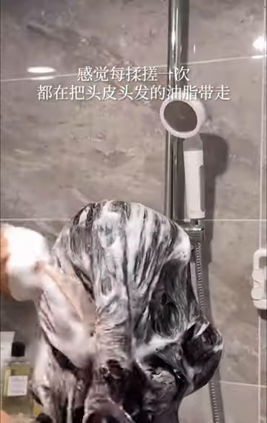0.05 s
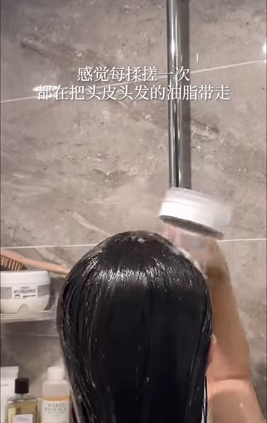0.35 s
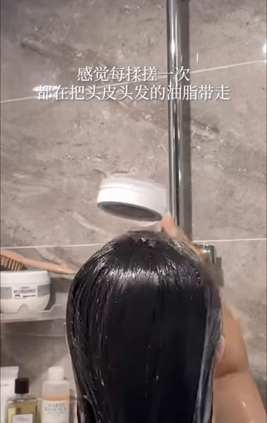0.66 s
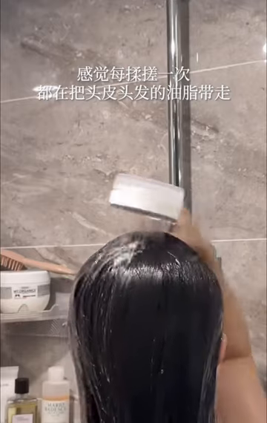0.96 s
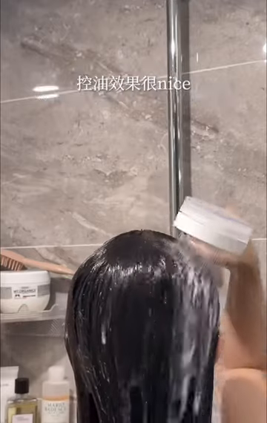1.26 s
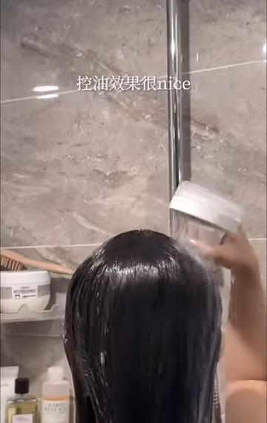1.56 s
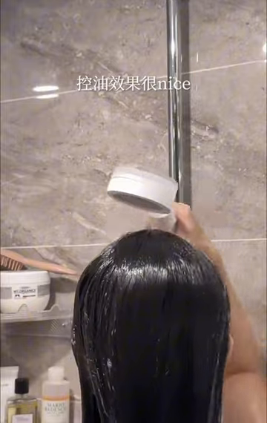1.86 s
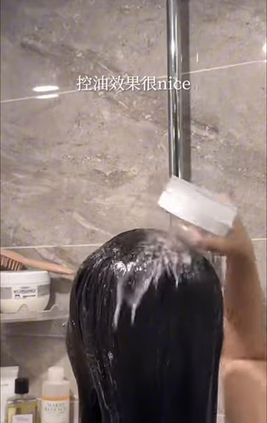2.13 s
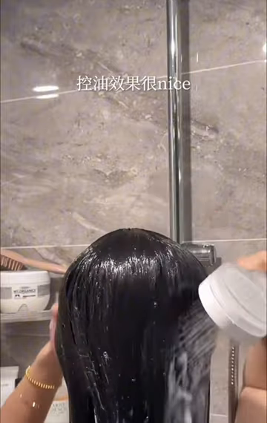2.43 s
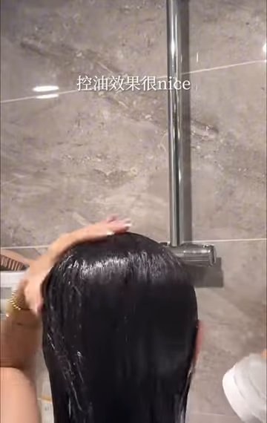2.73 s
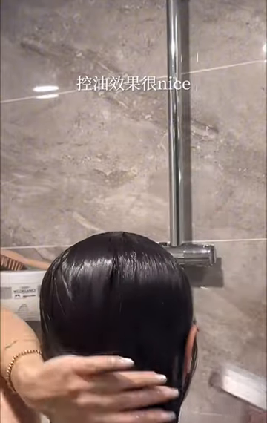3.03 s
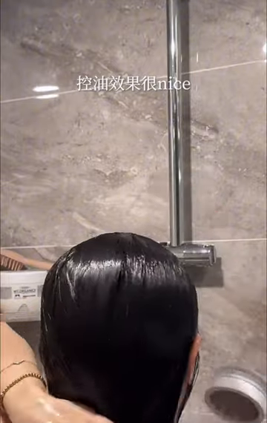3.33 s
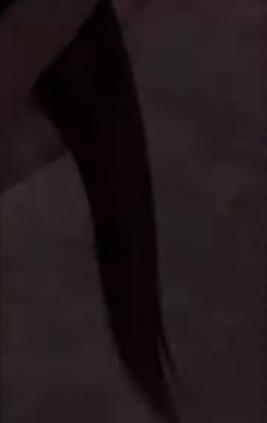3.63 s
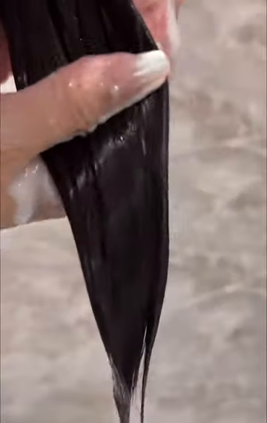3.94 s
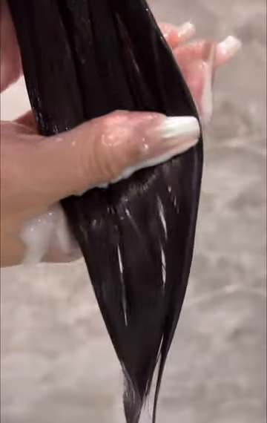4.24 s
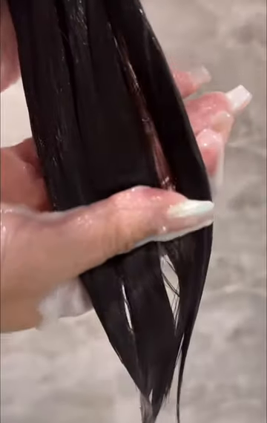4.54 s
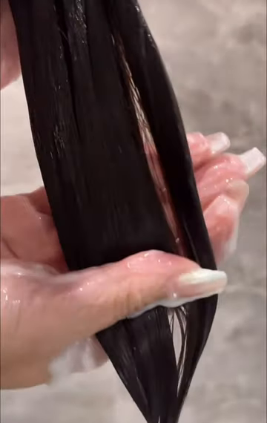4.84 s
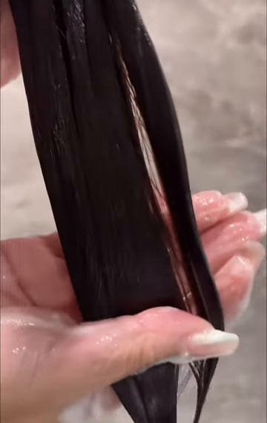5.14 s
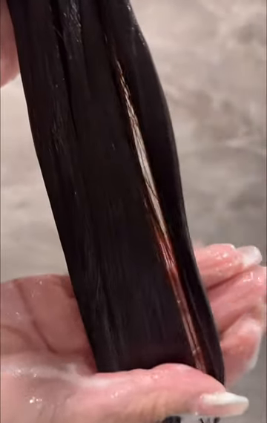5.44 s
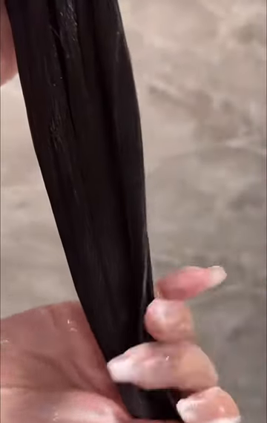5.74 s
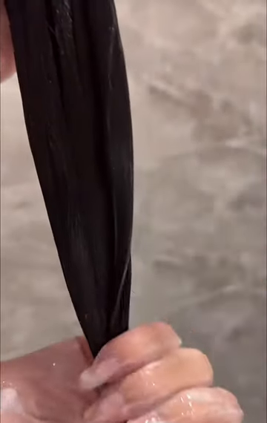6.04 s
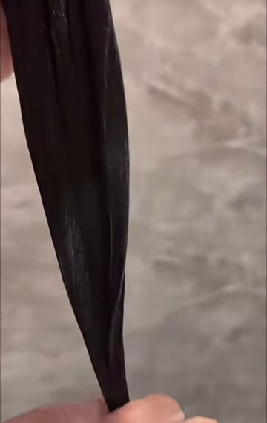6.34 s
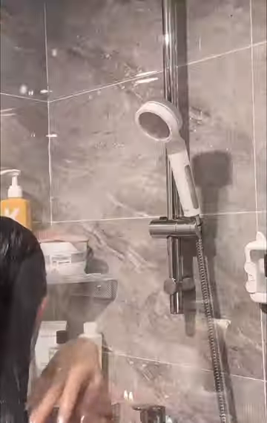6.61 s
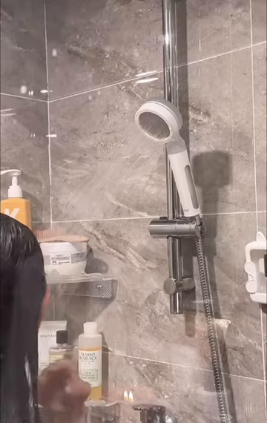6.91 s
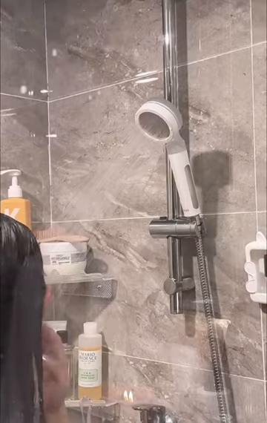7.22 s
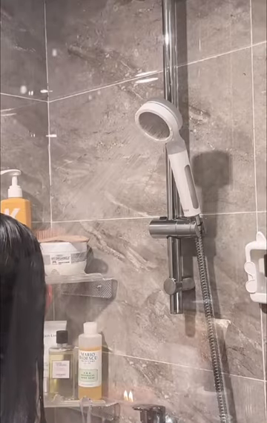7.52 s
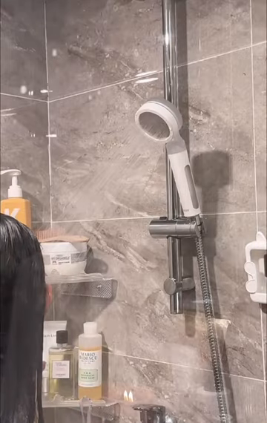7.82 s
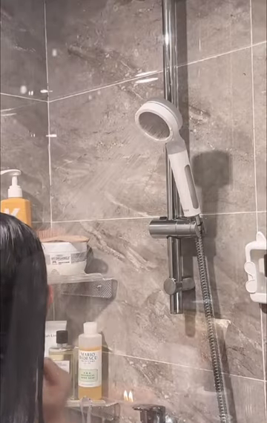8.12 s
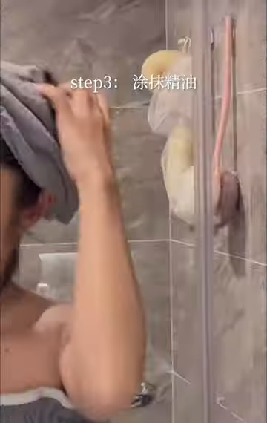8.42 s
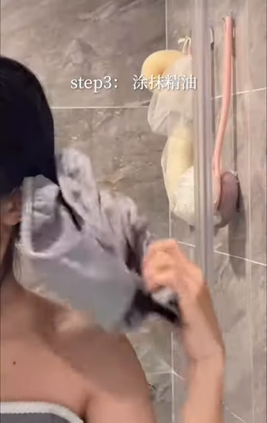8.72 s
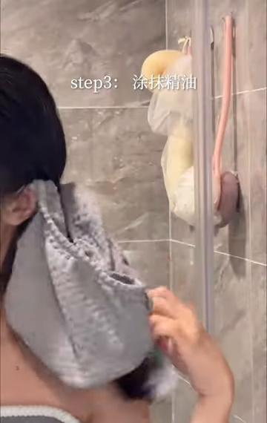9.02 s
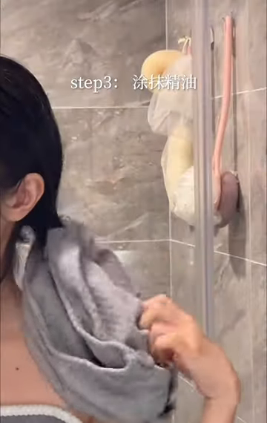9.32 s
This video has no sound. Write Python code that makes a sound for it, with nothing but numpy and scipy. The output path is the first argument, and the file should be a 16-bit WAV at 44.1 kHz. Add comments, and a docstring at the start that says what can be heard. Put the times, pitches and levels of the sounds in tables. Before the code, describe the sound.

Hands briefly squelch through lather, then a hand shower hisses and splashes over hair, drumming lightly on the scalp. The water cuts off, leaving soft crackles and tiny pops as fingers draw conditioner down wet strands over a faint fan hum. The shower returns, splashing on tiles, then gives way to a quiet towel rustle. Everything is heard close up in a small tiled bathroom, with abrupt changes.

```python
"""A hand shower rinses hair in a small tiled bathroom: countless drops splash, hiss and drum on the scalp.
Just before it, hands squelch through lather. After it, fingers draw conditioner down a wet lock, popping
tiny films; the shower runs again, splashing on the tiles; and a towel rustles off the hair.
The five actions follow each other abruptly, over a faint pump, pipes or fan."""
import sys
import numpy as np
from scipy import signal
from scipy.fft import rfft, irfft
from scipy.io import wavfile

SR = 44100
rng = np.random.default_rng(int(sys.argv[2]) if len(sys.argv) > 2 else 0)


def to_wav(s):
    """Save 16-bit WAV."""
    ch = np.atleast_2d(s).T  # columns
    pcm = np.round(np.clip(ch, -1, 1) * 32767)  # PCM
    wavfile.write(sys.argv[1], SR, pcm.astype(np.int16))


N = 422037
TIME = np.arange(N) / SR
# when each action is heard: (start [s], end [s])
LATHER_SPAN, RINSE_SPAN, CONDITIONER_SPAN = (-.1, .329), (.364, 3.669), (3.669, 6.43)
SHOWER_SPAN, TOWEL_SPAN = (6.433, 8.37), (8.43, 9.7)


def from_db(db):
    """Turn decibels into a gain to multiply by."""
    return 10 ** (np.asarray(db) / 20)


def rms_one(x):
    """Scale a sound (in stereo, the mean of both sides) to an average strength, or rms, of 1."""
    return x / np.sqrt(np.mean(np.atleast_2d(x).mean(0) ** 2) + 1e-20)


def gains(rows):
    """Join the points of each level column into a gain for every sample."""
    times, *columns = np.transpose(rows)
    return [from_db(np.interp(TIME, times, db)) for db in columns]


def during(span):
    """A gain of 1 inside the span and 0 outside, with quick smooth fades."""
    return .5 + .5 * np.tanh(np.minimum(TIME - span[0], span[1] - TIME) / .008)


def bursts(rows, rise_s, fall_s):
    """The loudness of short contacts: each rises, holds and dies away."""
    return sum(from_db(db) * np.clip((TIME - start) / rise_s, 0, 1)
               * np.exp(-np.maximum(TIME - start - length, 0) / fall_s) for start, length, db in rows)


def swells(rows, half_s):
    """A bell-shaped bump in dB around each listed moment."""
    return sum(db * np.exp(-((TIME - at) / half_s) ** 2) for at, db in rows)


def flutter(rate_hz, depth_db):
    """A gain that wanders at random around 1."""
    step, settle = 40, 2000  # samples per random value; values skipped while the filter settles
    pole = np.exp(-2 * np.pi * step * rate_hz / SR)
    noise = rng.standard_normal(N // step + settle + 2)
    slow = signal.lfilter([1], [1, -2 * pole, pole * pole], noise)[settle:]
    return np.interp(np.arange(N) / step, np.arange(len(slow)), from_db(depth_db * rms_one(slow)))


def colour(x, spectrum, size=2048):
    """Make each frequency louder or softer, as a table says."""
    hz, db = np.transpose(spectrum)
    bins = np.maximum(np.fft.rfftfreq(size, 1 / SR), 1)
    cepstrum = irfft(np.log(from_db(np.interp(np.log(bins), np.log(hz), db))))
    # minimum phase: the filter rings only after a click, never before it
    cepstrum[1:size // 2] *= 2
    cepstrum[size // 2 + 1:] = 0
    return signal.oaconvolve(x, irfft(np.exp(rfft(cepstrum))))[:N]


def band(x, low_hz, high_hz, order=3):
    """Keep only the sound between two frequencies; rms 1."""
    sos = signal.butter(order, [low_hz, min(high_hz, .45 * SR)], "band", fs=SR, output="sos")
    return rms_one(signal.sosfilt(sos, x + 1e-18))


def resonate(x, hz, width_hz):
    """Ring at one pitch; the narrower the width, the longer the ring."""
    pole = np.exp(-np.pi * width_hz / SR)
    feedback = [1, -2 * pole * np.cos(2 * np.pi * hz / SR), pole * pole]
    return signal.lfilter(np.array([1, 0, -1]) * (1 - pole * pole) / 2, feedback, x + 1e-18)


def body(x, modes):
    """An object rings at its own pitches, each filtered twice so that little else gets through; rms 1."""
    return rms_one(sum(from_db(db) * rms_one(resonate(resonate(x, hz, 1.25 * width), hz, 1.25 * width))
                       for hz, width, db in modes))


def impacts(per_s, spread_db):
    """Tiny blows at random moments, most weak and a few strong."""
    at = np.flatnonzero(rng.random(N) < per_s / SR)
    strength = from_db(spread_db * np.minimum(rng.exponential(1, len(at)), 4))
    out = np.zeros(N)
    out[at] = strength * rng.choice([-1, 1], len(at))
    return out


def widen(mid, side, width):
    """Make stereo: a second sound is added on the left and subtracted on the right."""
    return mid + colour(side, width) * np.array([[1], [-1]])


def drops(per_s, spread_db, spectrum, width):
    """The stereo patter of many small impacts; rms 1."""
    return rms_one(widen(*[colour(impacts(per_s, spread_db), spectrum) for _ in range(2)], width))


def bubbles(per_s, spread_db, low_hz, high_hz, cycles, count=10):
    """Air pockets burst at random, each ringing briefly at a pitch set by its size; rms 1."""
    clicks, sizes = impacts(per_s, spread_db), rng.integers(0, count, N)
    pitches = np.geomspace(low_hz, min(high_hz, .4 * SR), count)
    rings = (resonate(clicks * (sizes == k), hz, 1.7 * hz / cycles) for k, hz in enumerate(pitches))
    return rms_one(sum(rings))


# tone of the moving air: (frequency [Hz], level [dB])
AIR_COLOUR = [(25, -7), (70, 0.5), (150, -5), (300, -8), (500, -12), (1000, -22.5), (4000, -22.5),
              (16000, -31.5)]
# stereo spread of the room: (frequency [Hz], side level [dB])
ROOM_WIDTH = [(70, -2), (200, -16), (700, -5), (2400, -21)]
# hum of the fan from near and from far: (pitch [Hz], width [Hz], level [dB])
FAN_NEAR = [(72, 22, -10.5), (119, 8.8, -6.5), (198.4, 29.6, 2.5), (326, 17, -9.5)]
FAN_FAR = [(69.4, 16, -8), (137, 13, -0.5), (239, 4.8, -0.5)]

def fan():
    """A fan hums behind the conditioner and the towel; a faint rush of air never stops."""
    air = drops(20000, 1, AIR_COLOUR, ROOM_WIDTH)
    mono_air = air.mean(0)
    near_hum = body(widen(*rng.standard_normal((2, N)), ROOM_WIDTH), FAN_NEAR)
    near = from_db(-49) * near_hum + from_db(-54) * air
    far = from_db(-56) * body(rng.standard_normal(N), FAN_FAR) + from_db(-63) * mono_air
    return near * during(CONDITIONER_SPAN) + far * during(TOWEL_SPAN) + from_db(-63.5) * mono_air


# drone of the pump: (pitch [Hz], width [Hz], level [dB])
PUMP = [(82.4, 12, 0)]
# tone of rumbling water: (frequency [Hz], level [dB])
RUMBLE_COLOUR = [(25, -10), (60, 2.5), (140, 1.5), (450, -2), (800, -19.5)]
# a broad stereo spread, made artificially wider near 8 kHz: (frequency [Hz], side level [dB])
BROAD_WIDTH = [(70, 1), (250, -5), (700, -1), (2400, -2.5), (5500, -9), (8200, 5), (10000, -3),
               (15000, -13)]

def plumbing():
    """A pump drones and water rumbles in the pipes, louder while lathering than while rinsing."""
    drone = body(widen(*rng.standard_normal((2, N)), width=[(60, -20), (200, -18)]), PUMP)
    rumble = drops(3000, 6.3, RUMBLE_COLOUR, BROAD_WIDTH)
    loud = from_db(-35.5) * drone + from_db(-40.5) * rumble
    soft = from_db(-48) * drone + from_db(-48.5) * rumble
    return loud * during(LATHER_SPAN) + soft * during(RINSE_SPAN)


# the towel rubs on the hair: (time [s], level [dB])
TOWEL_RUB = [(8.44, -49.5), (8.59, -46), (8.71, -59.5), (9.01, -57.5), (9.56, -59.5)]
# the towel flicks free: (time [s], length [s], level [dB])
TOWEL_FLICKS = [(8.947, 0.0065, -40.5), (9.11, 0.021, -46)]
# tone of the cloth: (frequency [Hz], level [dB])
TOWEL_COLOUR = [(290, -38.5), (500, -2.5), (2100, -1.5), (4470, -4), (7100, 0.5), (12100, -25), (14200, -4),
                (16000, -7)]

def towel():
    """Cloth fibres rub over the hair and flick as the wrap comes loose."""
    rub, = gains(TOWEL_RUB)
    fibres = rms_one(colour(impacts(9000, 1.9), TOWEL_COLOUR))
    folds = rms_one(colour(impacts(1800, 2.5), TOWEL_COLOUR))
    return rub * fibres + bursts(TOWEL_FLICKS, rise_s=.0018, fall_s=.014) * folds


# hands knead the lather: (time [s], squelch level [dB], fizz level [dB])
KNEADING = [(0.0, -21, -29), (0.06, -22.5, -25), (0.09, -22.5, -27), (0.12, -28.5, -31.5), (0.21, -23, -28),
            (0.3, -34, -40), (0.32, -25, -36.5)]
# tone of the lather: (frequency [Hz], level [dB])
LATHER_COLOUR = [(88, -17), (150, 4), (263, -11), (1020, -1), (1290, -7.5), (1700, -10), (7410, -22.5),
                 (8170, -31), (10300, -25.5), (15500, -40)]

def lather():
    """Squeezed foam squelches in big air pockets and fizzes in small ones."""
    squelch, fizz = gains(KNEADING)
    mid, side = [colour(bubbles(1800, 1.4, 246, 2140, cycles=21), LATHER_COLOUR) for _ in range(2)]
    pockets = rms_one(widen(mid, side, BROAD_WIDTH))
    foam = band(drops(5000, .85, LATHER_COLOUR, BROAD_WIDTH), 1250, 17000)
    return from_db(-3.5) * squelch * pockets + from_db(.5) * fizz * foam


def room_ring(x, ring_s):
    """The bathroom's echoes blur into a ring that falls by 60 dB in ring_s."""
    t = TIME[:SR // 2]
    tails = rng.standard_normal((2, len(t))) * from_db(-60 * t / ring_s) * (t > .003)
    return widen(*[signal.oaconvolve(x, tail / np.linalg.norm(tail))[:N] for tail in tails], ROOM_WIDTH)


# films of conditioner pop: (time [s], peak level [dB], pitch [Hz], ring length [cycles])
POPS = [(3.938, -32, 3870, 13), (4.0214, -29.5, 2640, 32), (4.085, -28.5, 3330, 8), (4.1184, -26, 6630, 24),
        (4.18, -25, 4690, 18), (4.205, -35.5, 826, 19), (4.2228, -27.5, 4440, 9), (4.259, -25, 3490, 12),
        (4.3002, -22.5, 4950, 20), (4.3396, -25, 6300, 21), (4.4568, -23.5, 3940, 4.7),
        (4.4964, -26, 6450, 16), (4.5445, -24, 3070, 4), (4.664, -28, 5440, 42), (4.6879, -21.5, 4260, 25),
        (4.7525, -23.5, 3150, 15), (4.886, -28, 5550, 9), (5.0188, -24.5, 3920, 7.6),
        (5.0575, -22, 4350, 8), (5.0703, -22, 4260, 17), (5.1005, -32, 4390, 24), (5.1489, -23.5, 5040, 22),
        (5.223, -22, 3140, 7), (5.2714, -25, 4900, 12), (5.3193, -19, 3020, 5), (5.378, -21, 4090, 5.5),
        (5.414, -25, 4780, 17), (5.4928, -20.5, 3900, 4.9), (5.562, -28, 2200, 6),
        (5.6239, -20.5, 6900, 22), (5.6752, -19.5, 3120, 16), (5.7071, -14.5, 4700, 8.7),
        (5.9196, -24.5, 6400, 16), (5.9279, -29.5, 2250, 6.2), (5.98, -25.5, 4570, 31),
        (6.031, -25, 2450, 6), (6.081, -23, 6190, 20), (6.3111, -24, 2970, 5.8), (6.3709, -23.5, 6930, 22)]
# tone of a snapping film: (frequency [Hz], level [dB])
SNAP_COLOUR = [(700, -12), (2600, -5), (8000, 3), (10500, -12)]

def pops(snap_gain=.64, glide=.063, build_cycles=.31, samples=2048):
    """Each film snaps and sets its air pocket ringing briefly, rising a little in pitch."""
    out, t = np.zeros(N + samples), TIME[:samples]
    snap = colour(signal.unit_impulse(samples), SNAP_COLOUR)[:samples]
    for start, db, hz, cycles in POPS:
        age = t * hz / cycles
        tone = np.sin(2 * np.pi * hz * t * (1 + glide * np.minimum(age, 1)))
        ring = tone * from_db(-60 * age) * (1 - np.exp(-t * hz / build_cycles))
        pop = ring / np.abs(ring).max() + snap_gain * snap / np.abs(snap).max()
        at = round(start * SR)
        out[at:at + samples] += from_db(db) * pop / np.abs(pop).max()
    return out[:N]


# the loose hand slides and the thumb squeezes: (time [s], length [s], level [dB])
HAND_SLIDE = [(4.1, 2.1, -57)]
THUMB_SQUEEZES = [(4.14, 0.025, -53), (4.21, 0.098, -50.5), (4.324, 0.12, -51.5), (4.72, 0.075, -52.5),
                  (4.872, 0.026, -44), (5.05, .23, -45), (5.278, 0.16, -51), (5.558, 0.19, -51.5),
                  (5.794, 0.049, -51), (6.016, 0.018, -45), (6.06, 0.14, -48.5), (6.195, 0.21, -49.5)]
# tone of crackling wet hair: (frequency [Hz], level [dB])
CRACKLE_COLOUR = [(350, -34), (800, 0), (1300, -8), (1900, -6), (3030, -1), (4810, -0.5), (8200, -5),
                  (10200, -19), (15500, -44)]

def conditioner(flurry_s=.0052, flurry_db=-23.5):
    """Wet strands part under the thumb: a fine fizz with small pops, louder as it presses."""
    # neighbouring films tear around each pop
    flurries = bursts([(at, flurry_s, db + flurry_db) for at, db, *_ in POPS], flurry_s, flurry_s)
    press = np.hypot(bursts(HAND_SLIDE + THUMB_SQUEEZES, rise_s=.02, fall_s=.02), flurries)
    fizz = rms_one(colour(flutter(45, 2.4) * impacts(9000, 1.8), CRACKLE_COLOUR))
    films = rms_one(colour(bubbles(260, 2.4, 1500, 8500, cycles=13, count=24), CRACKLE_COLOUR))
    # the finest foam sparkles at first and slowly collapses
    fine_foam = band(impacts(220, 2.7), 5500, 20000, order=2)
    sparkle = bursts([(4.05, .68, -58)], rise_s=.05, fall_s=.26) * fine_foam
    direct = press * (from_db(-4) * fizz + films) + pops() + sparkle
    return direct + from_db(-14) * room_ring(direct, ring_s=.044)


def wall_echoes(x, strength, shift_hz, count=4):
    """Sound bounces off the tiles; as the source moves, each quick echo swells and fades."""
    out = x.copy()
    for delay_s, pace, phase in rng.uniform([.001, .5, 0], [.009, 1, 1], (count, 3)):
        swing = np.sin(2 * np.pi * (pace * shift_hz * TIME + phase))
        echo = np.pad(x, [(0, 0), (round(delay_s * SR), 0)])[:, :N]
        out += strength * np.sqrt(2 / count) * swing * echo
    return out / np.sqrt(1 + strength ** 2)


def spray(spectrum, width, split_hz, rough_db):
    """Three sounds of falling water: heavy run-off plops, drops splash, fine jets hiss."""
    plops = band(drops(1300, 2, spectrum, width), 463, 1054, order=4) * flutter(8.3, .36)
    splashes = band(drops(7000, 3.2, spectrum, width), 1127, split_hz, order=4) * flutter(17, rough_db)
    jets = band(drops(22000, 2.44, spectrum, width), split_hz, 20400, order=6)
    return plops, splashes, jets * flutter(25, .57 * rough_db)


# a moving dip in the tone of the splashing: (time [s], centre [Hz], depth [dB])
HOLLOW_DIP = [(6.7, 400, 5), (6.99, 450, 2.5), (7.04, 640, 14), (7.14, 330, 21), (7.25, 208, -3),
              (7.39, 110, 16)]

def hollowed(x, half_width_octaves=.73, size=1024):
    """The splashing briefly turns hollow as a broad dip slides through the low tones."""
    hz, times, frames = signal.stft(x, SR, nperseg=size)
    when, centre_hz, depth_db = np.transpose(HOLLOW_DIP)
    octaves = np.log2(np.maximum(hz, 1)[:, None] / np.interp(times, when, centre_hz))
    shape = np.exp(-(octaves / half_width_octaves) ** 2)
    dip_db = np.interp(times, when, depth_db, left=0, right=0) * shape
    return signal.istft(frames * from_db(-dip_db), SR, nperseg=size)[1][..., :N]


# tone of the shower's splashing, with a narrow band near 8 kHz filtered out: (frequency [Hz], level [dB])
SPLASH_FILTER = [(50, -7.5), (130, -12), (440, -15.5), (850, -11.5), (1300, -5.5), (1900, -0.5), (2800, -2),
                 (4200, -6.5), (7450, -6.5), (8200, -28), (10300, -4.5), (12000, -14.5), (16000, -13.5)]
# stereo spread of the splashing: centred treble, plus an artificial wide hiss near 8 kHz:
# (frequency [Hz], side level [dB])
SPLASH_WIDTH = [(100, -24), (380, -10), (750, -3.5), (1300, -8.5), (5000, -114), (8000, 21.5),
                (15000, -100)]
# ring of the shower stall: (pitch [Hz], width [Hz], level [dB])
STALL_RING = [(1880, 17, 13.6), (2060, 10, 8), (2203, 16, 13), (2380, 25, 7.9), (2496, 19, 10),
              (2710, 13, 13.3)]
# the body steps into the spray and shields the floor: (time [s], drop in level [dB])
SHIELDING = [(7.83, 6)]
# the stream thuds on skin: (time [s], length [s], level [dB])
SKIN_THUDS = [(6.41, 0.2, -45.5), (7.3, 0.29, -47), (7.45, 0.08, -38), (7.95, .2, -43.5), (8.18, .2, -39)]

def shower():
    """Water falls past the body to the floor and rings the stall; splashing slowly gives way to hiss."""
    elapsed_s = np.clip(TIME, *SHOWER_SPAN) - SHOWER_SPAN[0]
    shield_db = swells(SHIELDING, half_s=.12)
    run_off = from_db(-42 - shield_db)
    splash = from_db(-21.5 - 1.16 * elapsed_s - shield_db)
    hiss = from_db(-22.5 + .9 * elapsed_s - .36 * shield_db)
    thud = from_db(-52.5) + bursts(SKIN_THUDS, rise_s=.0063, fall_s=.16)  # stray drops between thuds
    plops, splashes, jets = spray(SPLASH_FILTER, SPLASH_WIDTH, split_hz=3190, rough_db=.63)
    water = wall_echoes(splash * splashes + hiss * jets, strength=.43, shift_hz=.306)
    stall = from_db(-8) * splash * body(impacts(7000, .92), STALL_RING)
    skin = thud * band(drops(450, 1.2, SPLASH_FILTER, SPLASH_WIDTH), 85, 520, order=2)
    return hollowed(water + stall + skin + run_off * plops)


# spray slaps an ear, hand or shoulder: (time [s], length [s], level [dB], pitch [Hz], width [Hz])
SKIN_SLAPS = [(0.841, 0.024, -20.5, 3530, 4900), (2.735, 0.11, -26.5, 2400, 1800),
              (3.457, 0.16, -44, 201, 80), (6.86, 0.031, -25, 6260, 1300), (7.451, 0.062, -35, 316, 280),
              (7.708, 0.081, -20, 6040, 1790)]

def slaps():
    """Jets that cross bare skin flare up around one rough pitch."""
    patter = impacts(6000, .9)
    return sum(bursts([(at, length, db)], rise_s=.0048, fall_s=.026) * body(patter, [(hz, width, 0)])
               for at, length, db, hz, width in SKIN_SLAPS)


# water gathers in the hair, streams down one side, then misses the head:
# (time [s], run-off level [dB], splash level [dB])
RINSE_FLOW = [(0.37, -41, -31), (1.95, -43.5, -30.5), (2.28, -46.5, -33.5), (2.5, -34, -28),
              (2.81, -37.5, -28.5), (2.9, -53, -35.5), (3.07, -49.5, -39.5), (3.66, -40, -34.5)]
# the shower head sweeps close and gets louder: (time [s], rise in level [dB])
SWEEPS = [(0.48, 4), (0.76, 1.5), (1.17, 3), (1.6, 5), (1.92, 3), (2.13, 3.5), (2.74, 3), (3.2, 3.5),
          (3.6, 4)]
# jets hit the top of the head, the crown, straight on: (time [s], length [s], level [dB])
CROWN_PASSES = [(0.31, 0.065, -26.5), (0.97, 0.32, -38), (1.49, 0.12, -39.5), (1.8, 0.15, -35.5),
                (2.37, 0.13, -44.5), (3.57, 0.061, -46)]
# ring of the scalp: (pitch [Hz], width [Hz], level [dB])
SCALP_RING = [(352.6, 25, 0.5), (392.6, 28, -3)]
# tone of the spray's hiss, filtered thinner near 8 kHz: (frequency [Hz], level [dB])
SPRAY_FILTER = [(260, -53), (450, -24), (936, -10.5), (1500, 0), (2100, 0), (3700, -2.5), (6000, 2.5),
                (7400, 3.5), (8500, -3.5), (10700, 5.5), (12200, -3), (14300, 3), (16000, -6)]
# tone of the spray on the neck: (frequency [Hz], level [dB])
NECK_COLOUR = [(260, -51), (500, -14.5), (780, -6.5), (1400, -8.5), (3000, -0.5), (7700, 4.5), (12200, 0.5),
               (16000, -2)]
# stereo spread of the spray on the neck: (frequency [Hz], side level [dB])
NECK_WIDTH = [(300, -0.17), (2800, 0.82), (8200, 0.27), (13000, -1.3)]

def rinse(leaves_crown_s=2.534, move_s=.074):
    """The shower head sweeps over the hair, drumming on the scalp, then moves aside; water gurgles down."""
    run_off, splash = gains(RINSE_FLOW)
    near_db = swells(SWEEPS, half_s=.12)
    aside = .5 + .5 * np.tanh((TIME - leaves_crown_s) / move_s)  # 0 on the crown, 1 on the neck
    on_crown = spray(SPRAY_FILTER, BROAD_WIDTH, split_hz=3080, rough_db=1.67)
    on_neck = spray(NECK_COLOUR, NECK_WIDTH, split_hz=3050, rough_db=1.3)
    plops, splashes, jets = [np.sqrt(1 - aside) * crown + np.sqrt(aside) * neck
                             for crown, neck in zip(on_crown, on_neck)]
    sprayed = splash * from_db(.88 * near_db) * splashes + from_db(-23.5 + near_db) * jets
    gurgle = widen(*[bubbles(700, 1.3, 626, 3630, cycles=16, count=20) for _ in range(2)], NECK_WIDTH)
    water = wall_echoes(run_off * (plops + aside * gurgle) + sprayed, strength=1.1, shift_hz=1.4, count=6)
    drum = from_db(-51.5) + bursts(CROWN_PASSES, rise_s=.016, fall_s=.04)  # faint between passes
    scalp = drum * flutter(40, 1.5) * body(drops(900, 1.7, RUMBLE_COLOUR, BROAD_WIDTH), SCALP_RING)
    return water + scalp * from_db([[2], [-3]])  # the drumming is louder on the left


def scene():
    """The five actions one after another, over the sounds of the room."""
    actions = [(lather, LATHER_SPAN), (rinse, RINSE_SPAN), (conditioner, CONDITIONER_SPAN),
               (shower, SHOWER_SPAN), (towel, TOWEL_SPAN)]
    return sum(source() * during(span) for source, span in actions) + slaps() + plumbing() + fan()


def record(dry):
    """The highest treble, above 16000 Hz, is cut steeply."""
    return signal.sosfilt(signal.ellip(12, .1, 80, 16000, fs=SR, output="sos"), dry)


dry = scene()
out = record(dry)
to_wav(out)
```